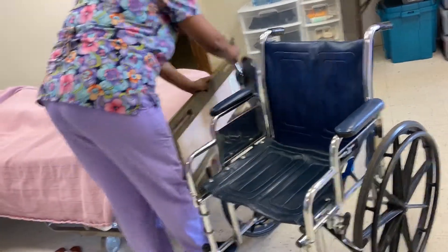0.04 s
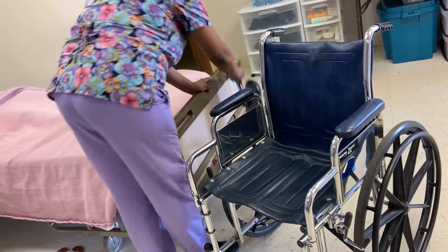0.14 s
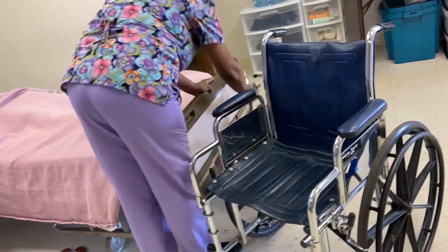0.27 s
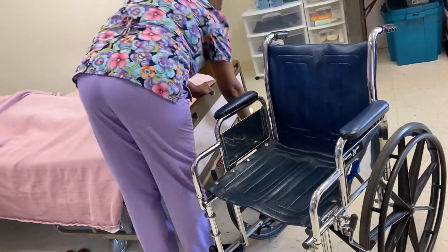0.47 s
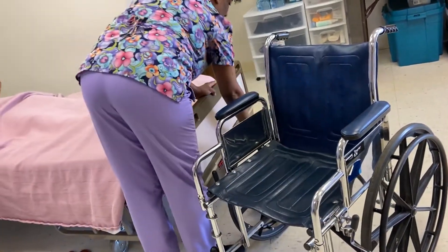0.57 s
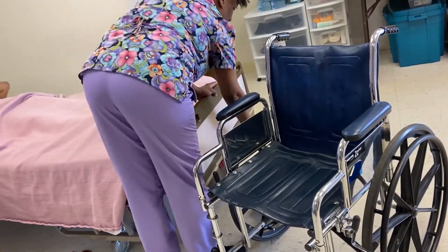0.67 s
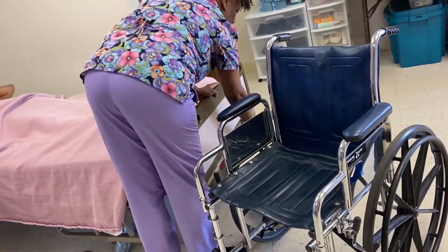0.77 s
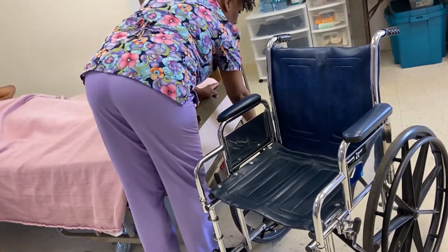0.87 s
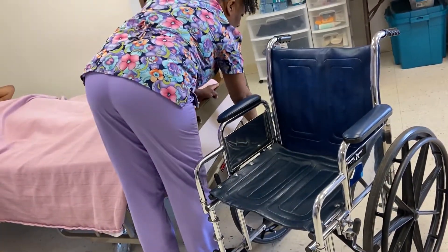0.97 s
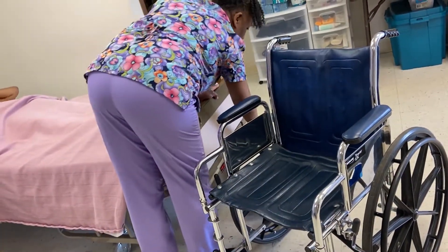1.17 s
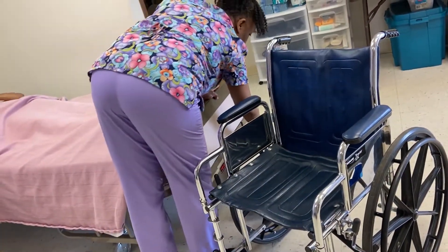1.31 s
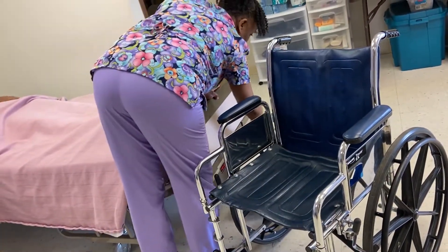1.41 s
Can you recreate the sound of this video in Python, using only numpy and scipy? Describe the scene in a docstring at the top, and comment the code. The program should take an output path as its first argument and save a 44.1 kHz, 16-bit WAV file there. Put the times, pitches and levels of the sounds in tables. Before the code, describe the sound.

A bed's end board clacks onto its steel frame, with scuffing and soft rubbing groans.

```python
"""A bed's end board is lowered onto its steel frame beside a wheelchair, in a small hard room.
It shuffles, then lands at about 0.25 s with quick clacks: each impact excites the modes of board,
rail and frame, and the fittings rattle. Friction draws a soft groan, more clacks and scuffing follow
from 0.6 s, and a second groan at 1.1 s leads into the last clacks. The room reverberates briefly;
all is heard through a close stereo microphone pair with a steep bass cut."""
import sys
import numpy as np
from scipy import signal
from scipy.fft import rfft, irfft
from scipy.io import wavfile
from scipy.ndimage import uniform_filter1d

SR = 44100
rng = np.random.default_rng(int(sys.argv[2]) if len(sys.argv) > 2 else 0)


def master(y):
    """Save y as 16-bit WAV."""
    cut = np.clip(np.atleast_2d(y).T, -1, 1)
    pcm = np.round(cut * 32767)  # scale
    wavfile.write(sys.argv[1], SR, pcm.astype(np.int16))


N = 63945

# impacts of board on frame: (time [s], five clatter band levels [dB], clatter t60 [s], board level [dB],
# place [0 edge to 1 face], rail level [dB], struck spot's frequency [Hz], its level [dB])
IMPACTS = [ (.095, -48, -43, -47, -63, -63.5, 0.07, -47, 0.56, -51, 262, -33.5),
           (0.223, -38, -22, -25, -22.5, -26, 0.079, -18, 0.016, -44, 694, -29),
           (.238, -31.5, -22.5, -45, -35, -41, 0.046, -27, .02, -37, 689, -19.5),
           (.271, -22, -22.5, -20.5, -24.5, -25.5, 0.1, -9, 1, -38, 221, -35),
           (.602, -36, -34, -29.5, -34, -37, 0.11, -64, 0.41, -26.5, 216, -36),
           (.658, -38, -38, -38.5, -43.5, -46, 0.28, -45, .2, -34, 429, -29),
           (.686, -44, -28, -28, -29.5, -36.5, 0.14, -43, 0.16, -31.5, 373.4, -28.5),
           (.853, -32.5, -36.5, -42, -51, -55, 0.2, -33, 0.25, -37, 277.6, -25),
           (.925, -42, -44.5, -51, -50, -59.5, 0.13, -66, .34, -46.5, 871, -34.5),
           (1.111, -47, -72, -54, -72, -73, 0.51, -70, .32, -43, 338, -62),
           (1.221, -32, -32, -25, -29, -33, 0.11, -33, 0.82, -39, 404, -22.5),
           (1.266, -34, -28.5, -38, -39, -41, 0.063, -59, .67, -53, 474, -28),
           (1.289, -41, -33, -28, -31.5, -40, 0.097, -33, 0.43, -42, 543, -38.5),
           (1.351, -62, -52, -38.5, -44.5, -49.5, 0.091, -69, .3, -56, 2676, -42)]
# board modes: (frequency [Hz], t60 [s], gain struck on the edge [dB], gain struck on the face [dB])
BOARD_MODES = [ (347.4, 0.2, -40, -3.5), (602.5, 0.24, 1.5, -2), (647, 0.18, -4, -6.5),
               (740, 0.19, -4.5, -24), (940, 0.22, -33, -10), (1118, 0.56, -18, -39),
               (1389, 0.16, -7.5, -11.5), (1610, 0.32, -27, -13.5), (2386, 0.067, -13, -31),
               (4160, 0.21, -8.5, -39), (4750, 0.033, 1, -45), (11750, 0.031, -7.5, -62)]
# modes of the side rail and of the steel frame: (frequency [Hz], t60 [s], gain [dB])
RAIL_MODES = [(839, 0.62, -10), (942, 0.11, 0), (1056, 0.17, -1.5), (1165, 0.29, -9), (1393, 0.35, -14),
              (1802, .16, -5.5), (2062, 0.095, -12)]
FRAME_MODES = [(174.8, 0.59, -14.5), (291, 1.45, -24)]
# ticks of the metal fittings: (time [s], levels of the top three clatter bands [dB], t60 [s])
FITTING_TICKS = [ (.161, -52, -48.5, -56, 0.021), (0.182, -51.5, -57.5, -62, 0.021),
                 (.216, -57, -49, -84, 0.25), (0.266, -29.5, -41, -29, 0.025), (.682, -54, -49, -31, 0.032),
                 (1.199, -37.5, -59, -59, 0.011), (1.208, -48, -50, -43, 0.019)]
# their modes: (frequency [Hz], t60 [s], gain [dB])
FITTING_MODES = [(2630, 0.045, -2), (5100, 0.06, -0.5), (7950, 0.032, 7)]
# five clatter bands, low to high: (centre [Hz]) and (rise time [s]); the bass swells more slowly
CLATTER_BAND_HZ = [260, 700, 1750, 4400, 11000]
CLATTER_RISE_S = [0.016, 0.0029, 0.00073, 0.0012, 0.00078]
# shifting of the board: (time [s], rumble level [dB], scuff level [dB])
SHUFFLE_LEVELS = [(0, -47.5, -67.5), (0.089, -50, -68), (.2, -44, -53.5), (.45, -51.5, -46),
                  (.58, -50.5, -59), (0.749, -48, -36.5), (.84, -57, -61.5), (0.972, -41, -50),
                  (1.07, -42, -51.5), (1.16, -41, -48), (1.222, -44, -41), (1.35, -43, -45.5),
                  (1.45, -62, -94)]
# board rubbing on frame: (start [s], duration [s], pitch [Hz], level [dB])
GROANS = [(0.424, 0.14, 442, -41.5), (1.112, 0.096, 345.3, -37.5)]
# noise spectra: (frequency [Hz], relative spectral density [dB])
CLATTER_SPECTRUM = [(150, -7.5), (350, -1), (500, 1), (900, 7), (2200, 3.5), (3200, -8), (4400, -9.5),
                    (6500, -16), (10000, -19), (12000, -18.5), (16000, -23.5)]
RUMBLE_SPECTRUM = [(100, 3.5), (180, 6), (250, 0), (360, -1.5), (520, -16), (900, -32), (3000, -64)]
SCUFF_SPECTRUM = [(150, 0.5), (500, 11.5), (1000, 1), (2100, -4), (4000, -15), (8000, -26.5), (16000, -56)]
AIR_SPECTRUM = [(100, 5.5), (300, 8.5), (700, -29), (2000, -19), (5000, -25.5), (10000, -24), (16000, -27)]
# reverberation: (band centre [Hz], t60 [s], gain [dB])
ROOM_BANDS = [(203, 0.26, 0), (580, 0.3, -3.5), (1380, 0.28, -5.5), (3700, 0.32, -6), (10900, 0.27, -7)]
# stereo width: (frequency [Hz], gain of the side signal [dB])
SIDE_GAIN = [(200, -10.5), (500, -6.5), (1200, -2), (4000, -3.5), (6000, -1), (7500, -13), (11000, -63),
             (16000, -19)]
# microphone pair: (frequency [Hz], phase lead of left [rad]) and (frequency [Hz], left over right [dB])
PAIR_PHASE = [(0, 0), (7000, 0), (8000, -1.3), (9050, -3.14), (10300, -5.4), (11500, -6.5), (13300, -9.42),
              (14800, -12.3), (16000, -12.57)]
PAIR_BALANCE = [(150, -2.5), (500, -1.5), (2000, 2), (5000, 1.5), (12000, 0)]

CLATTER_SIDE_DB, TONE_SIDE_GAIN = -3, 0.59


def contacts():
    """Impact excitation: each blow sets off a broadband clatter and the free vibration of the parts."""
    clacks, tones = np.zeros((2, 2, N))
    for s, *levels_db, t60, board_db, place, rail_db, spot_hz, spot_db in IMPACTS:
        bass_db = (levels_db[0] + levels_db[1]) / 2
        add(clacks, s, clatter(levels_db, t60))
        add(tones, s, board_ring(board_db, place, spot_hz, spot_db))
        add(tones, s, ring(RAIL_MODES, rail_db))
        add(tones, s, ring(FRAME_MODES, bass_db))
    for s, *levels_db, t60 in FITTING_TICKS:
        add(tones, s, ring(FITTING_MODES, levels_db[1]))
        add(clacks, s, clatter(levels_db, t60))
    return clacks, tones


def board_ring(db, place, spot_hz, spot_db, spot_t60=0.16, free_s=0.0254, seated_t60=0.035):
    """Contact damping: modes weighted by the place struck ring freely until the board seats."""
    modes = [(hz, t60, db + edge + place * (face - edge)) for hz, t60, edge, face in BOARD_MODES]
    free = ring(modes + [(spot_hz, spot_t60, spot_db)])
    seated_s = np.maximum(np.arange(free.shape[1]) / SR - free_s, 0)
    return free * decay(seated_s, seated_t60)


def ring(modes, level_db=0, rise_s=0.0048, detune=0.0042, size=40000):
    """Modal superposition: a struck body sounds as a sum of damped sines, here as mid and side."""
    t, out = np.arange(size) / SR, np.zeros((2, size))
    for hz, t60, db in modes:
        cycles = hz * (1 + detune * rng.standard_normal()) * t + rng.random((2, 1))
        out += amp(level_db + db) * decay(t, t60) * np.sin(2 * np.pi * cycles)
    return out * np.minimum(t / rise_s, 1) * [[1], [TONE_SIDE_GAIN]]


def clatter(levels_db, t60, size=16384):
    """Modal overlap: dense, short-lived modes merge into decaying noise bands, as mid and side."""
    t, out = np.arange(size) / SR, np.zeros((2, size))
    parts = bands(shaped(rng.standard_normal((2, size)), CLATTER_SPECTRUM), CLATTER_BAND_HZ)
    # from the top down, so a tick's three levels fill only the upper bands
    for part, rise, db in zip(parts[::-1], CLATTER_RISE_S[::-1], levels_db[::-1]):
        envelope = np.minimum(t / rise, 1) * decay(np.maximum(t - rise, 0), t60)
        burst = part * envelope
        out += amp(db) * burst * np.linalg.norm(envelope) / np.linalg.norm(burst, axis=1, keepdims=True)
    return out * amp([[0], [CLATTER_SIDE_DB]])


def shuffle(slips_per_s=6000):
    """Sliding friction: the shifted board rumbles, and tiny random slips add up to a scuff."""
    s, rumble_db, scuff_db = np.transpose(SHUFFLE_LEVELS)
    t = np.arange(N) / SR
    rumble = unit(shaped(rng.standard_normal((2, N)), RUMBLE_SPECTRUM))
    slips = rng.standard_normal((2, N)) * (rng.random(N) < slips_per_s / SR)
    slip_db = np.minimum(rng.exponential(1, N), 3)
    scuff = unit(shaped(slips * amp(slip_db), SCUFF_SPECTRUM))
    return rumble * amp(np.interp(t, s, rumble_db)), scuff * amp(np.interp(t, s, scuff_db))


def groans(pitch_spread=0.015, waver_s=0.003, wobble_db=-0.5):
    """Friction-driven oscillation: rubbing sustains a wavering note that swells and fades with the push."""
    out = np.zeros((2, N))
    for s, length, hz, db in GROANS:
        t = np.arange(0, length, 1 / SR)
        waver = unit(uniform_filter1d(rng.standard_normal(N), round(waver_s * SR)))[:len(t)]
        cycles = np.cumsum(hz * (1 + pitch_spread * waver)) / SR + rng.random((2, 1))
        push = np.sqrt(np.sin(np.pi * t / length))
        add(out, s, amp(db + wobble_db * waver) * push * np.sin(2 * np.pi * cycles))
    return out * [[1], [TONE_SIDE_GAIN]]


def room(source, delay_s=0.0053, build_s=0.013, echoes_per_s=4000, size=32768):
    """Reverberation: reflections from hard walls build up, then each band decays at its own rate."""
    t = np.arange(size) / SR
    echoes = rng.choice([-1., 1.], (2, size)) * (rng.random((2, size)) < echoes_per_s / SR)
    echoes *= np.clip((t - delay_s) / build_s, 0, 1)
    parts = bands(echoes, [row[0] for row in ROOM_BANDS])
    tail = 0
    for part, (_, t60, db) in zip(parts, ROOM_BANDS):
        envelope = decay(t, t60)
        tail += amp(db) * part * envelope / np.linalg.norm(echoes[0] * envelope)
    return signal.fftconvolve(source[None], tail, axes=1)[:, :N]


def still_air(db=-56):
    """Stationary noise: the room's faint, low background."""
    return amp(db) * unit(shaped(rng.standard_normal((2, N)), AIR_SPECTRUM))


def amp(db):
    """Decibel law: 20 dB is a tenfold amplitude."""
    return 10 ** (np.asarray(db) / 20)


def unit(x):
    """Normalisation to rms 1."""
    return x / np.sqrt(np.mean(x ** 2) + 1e-20)


def curve(points, hz):
    """Interpolation on a log-frequency axis."""
    knots_hz, values = np.array(points, float).T
    return np.interp(np.log(hz + 1), np.log(knots_hz + 1), values)


def freqs(x):
    """Fourier frequencies of x in Hz."""
    return np.fft.rfftfreq(x.shape[-1], 1 / SR)


def shaped(x, spectrum):
    """Linear filtering by a spectrum in dB."""
    return irfft(rfft(x) * amp(curve(spectrum, freqs(x))), x.shape[-1])


def bands(x, centres):
    """Complementary filtering: overlapping bands that sum to x."""
    shares = [curve(list(zip(centres, row)), freqs(x)) for row in np.eye(len(centres))]
    return [irfft(rfft(x) * np.sin(np.pi / 2 * share) ** 2, x.shape[-1]) for share in shares]


def decay(t, t60):
    """Exponential damping: 60 dB down after t60 seconds."""
    return np.exp(-np.log(1000) * t / t60)


def add(mix, s, sound):
    """Superposition: a sound joins the mix at s seconds."""
    part = mix[:, round(s * SR):][:, :sound.shape[1]]
    part += sound[:, :part.shape[1]]


def scene(tone_send_db=-7):
    """Superposition of direct sound, reflections and air; mid and side become left and right."""
    clacks, tones = contacts()
    rumble, scuff = shuffle()
    air = still_air()
    direct = clacks + tones + groans() + rumble + scuff
    reflections = room(clacks[0] + scuff[0] + amp(tone_send_db) * tones[0])
    mid, side = direct + reflections + air
    side = shaped(side, SIDE_GAIN)
    return np.array([mid + side, mid - side])


def record(dry, bass_cut_hz=167.6, leak_db=-32.5, top_hz=15850):
    """Frequency response of the microphone pair: steep bass cut, balance and phase, then a band limit."""
    padded = np.pad(dry, ((0, 0), (0, 4096)))
    hz = freqs(padded)
    bass_cut = amp(leak_db) + (1 + np.tanh((hz - bass_cut_hz) / 8)) / 2
    left_gain = amp(curve(PAIR_BALANCE, hz) / 2)
    pair = np.array([left_gain, np.exp(-1j * curve(PAIR_PHASE, hz)) / left_gain])
    heard = irfft(rfft(padded) * bass_cut * pair, padded.shape[1])[:, :N]
    lowpass = signal.firwin(255, top_hz, window=("kaiser", 9), fs=SR)
    return signal.oaconvolve(heard, lowpass[None], "same")


dry = scene()
out = record(dry)
master(out)
```